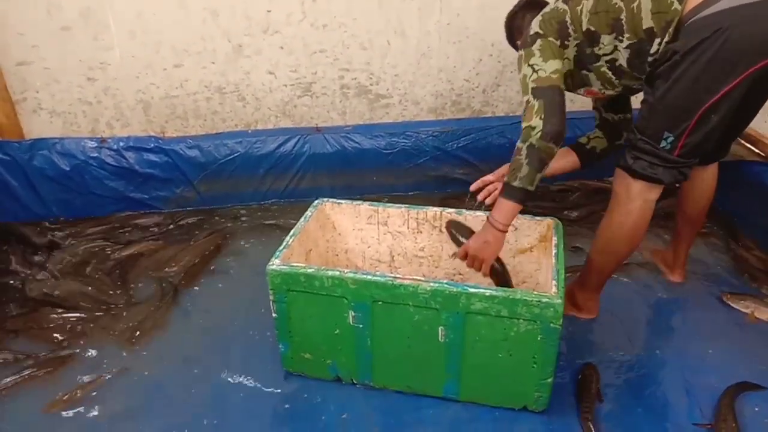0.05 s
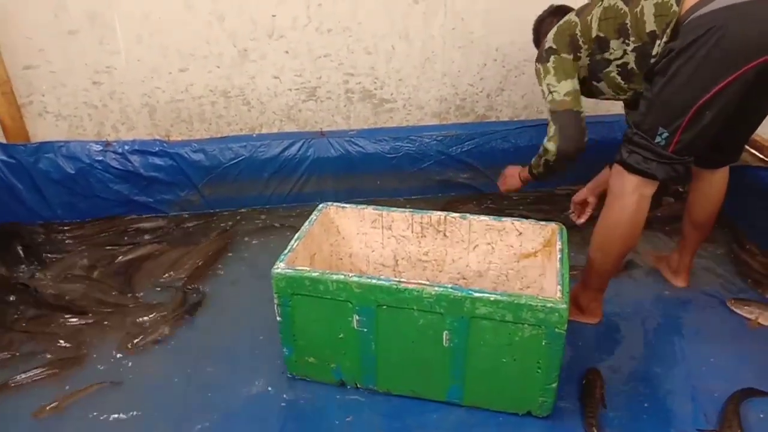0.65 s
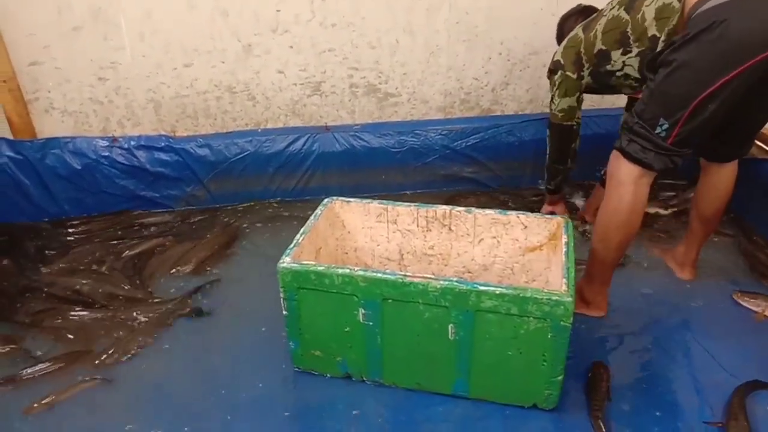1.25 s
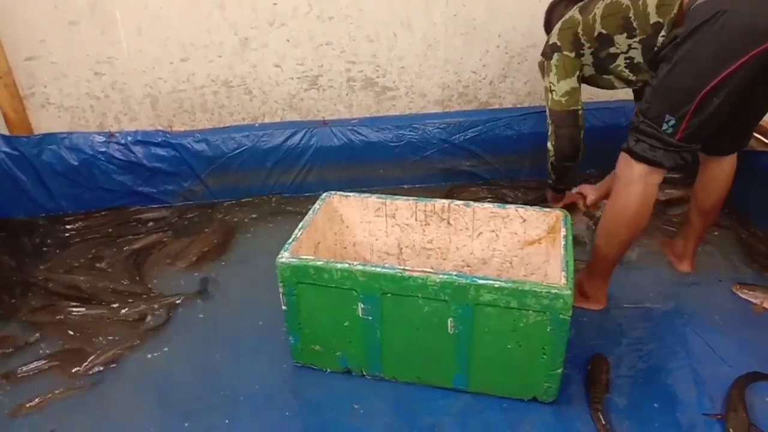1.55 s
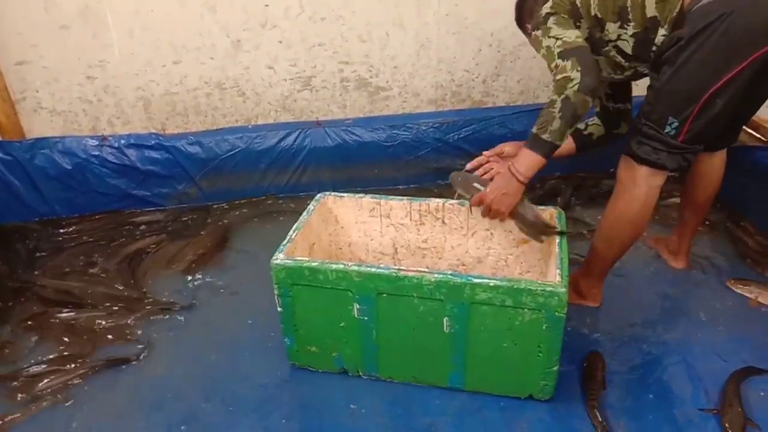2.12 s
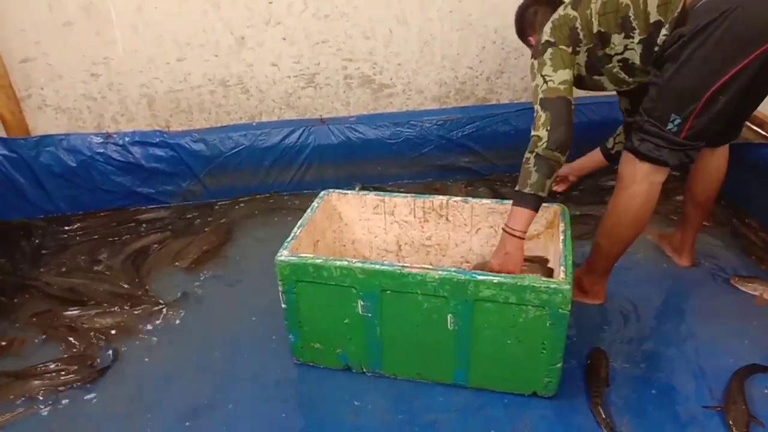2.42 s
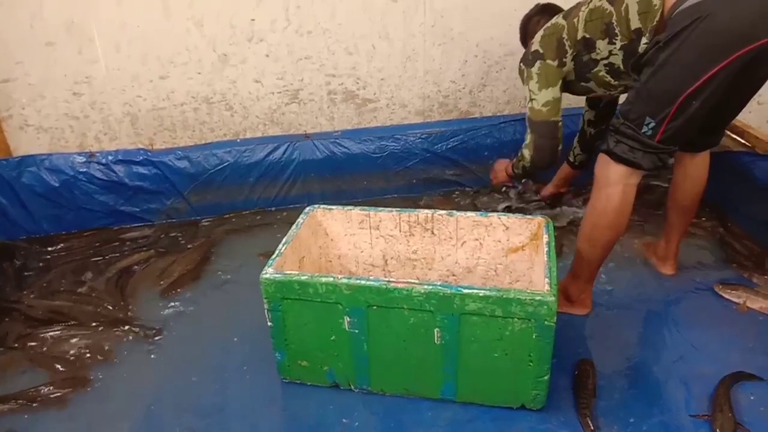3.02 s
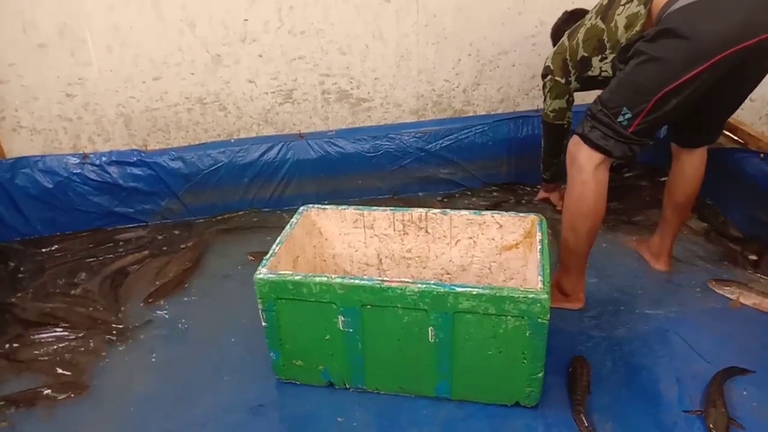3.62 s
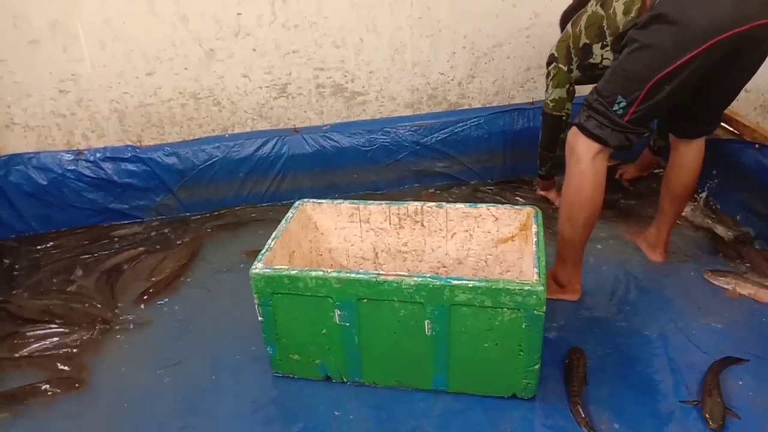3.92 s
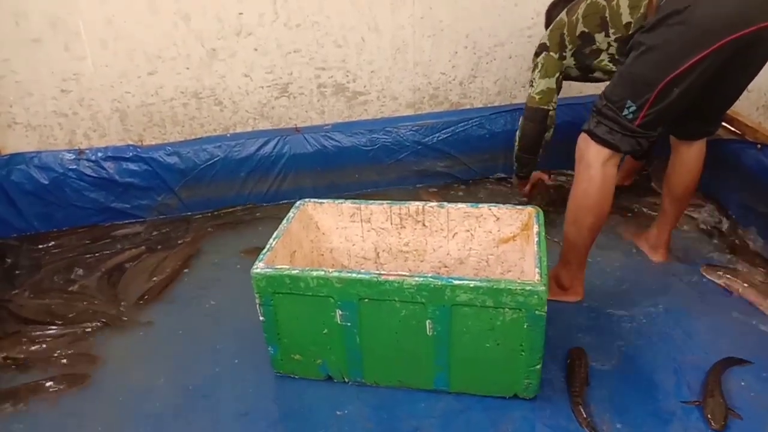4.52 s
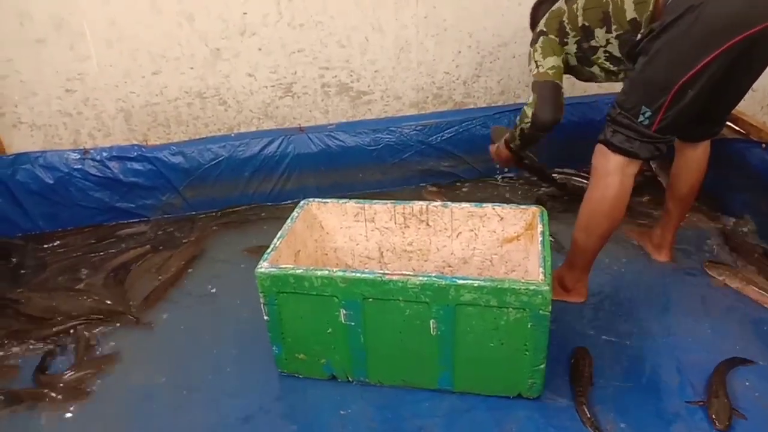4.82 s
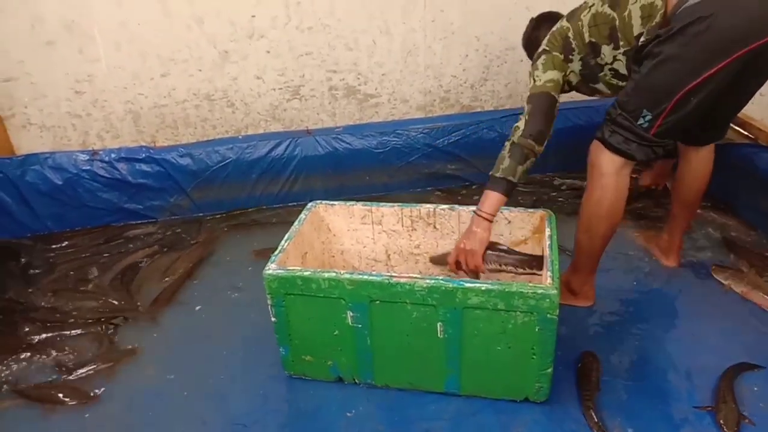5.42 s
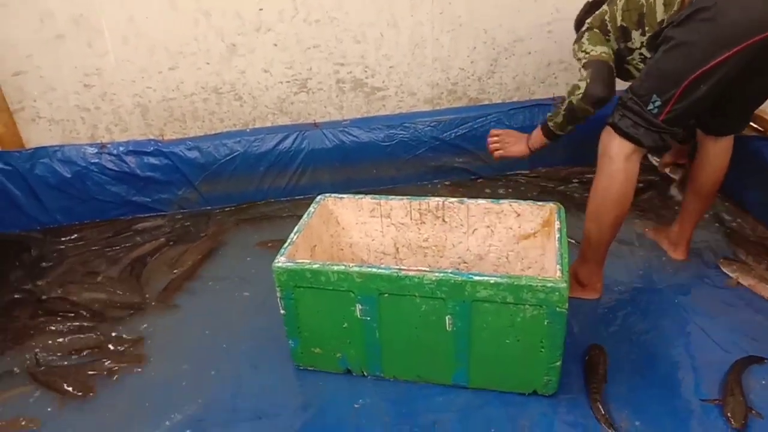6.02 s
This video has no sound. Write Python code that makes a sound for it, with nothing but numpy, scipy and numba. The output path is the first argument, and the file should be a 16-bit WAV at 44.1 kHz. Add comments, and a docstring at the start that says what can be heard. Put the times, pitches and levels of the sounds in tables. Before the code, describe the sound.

Fish thrash in a shallow tank as hands chase them, making repeated short splashes, wet slaps, gurgles and plops. A fish drops into an empty cool box with a hollow thud near the start, and softer knocks follow later. Near the end another lands and flops in a quick run of thumps before a last splash. One small microphone stands close by in a yard, with a short echo off a wall.

```python
"""A yard, beside a shallow tarp-lined tank, on one small microphone with a wall nearby.
Hands chase thrashing fish through the water and drop them into an empty cool box.
Churned water is a cloud of gulps, bubbles and spray; tails and hands slap the surface, bubbles plop,
spray spurts and drips. The wet fish smack and thud against the hollow box, which booms and rattles.
The wall adds a short echo, a faint steady wash lies behind, and the microphone colours it all."""
import sys
import numpy as np
from scipy import signal
from scipy.fft import rfft, irfft
from scipy.io import wavfile
from scipy.ndimage import uniform_filter1d
from numba import njit

SR = 44100
rng = np.random.default_rng(int(sys.argv[2]) if len(sys.argv) > 2 else 0)


def inscribe(sig):
    """Save sig as 16-bit PCM at rate SR to the path in sys.argv[1].

    A 1-D sig is mono; a 2-D sig holds one channel per row.
    Samples are clipped to [-1, 1] before scaling.
    """
    pcm = np.round(np.clip(np.atleast_2d(sig).T, -1, 1) * 32767)
    wavfile.write(sys.argv[1], SR, pcm.astype(np.int16))


N = 276066
TIME = np.arange(N) / SR

# bouts of thrashing: start_s, length_s, level_db, tiring_db_per_s, gulp_relative_db, spray_relative_db
THRASH_BOUTS = [(-.02, 0.038, -35, 36.5, -14.5, -18.5), (0.09, 0.1, -40.5, 6, -11.5, -18.5),
                (0.271, 0.53, -44, 5.5, -7, -24), (0.653, 0.13, -41.5, 5, -10.5, -30),
                (0.889, 0.22, -29, 6.5, -11.5, -27.5), (1.107, 0.22, -27.5, 1.5, -11.5, -23),
                (1.373, 0.36, -31.5, -3, -15, -24), (2.368, 0.24, -54.5, 18, 1.5, -18),
                (2.671, 0.032, -29.5, -17, -9, -24), (2.788, 0.094, -24, -0.5, -4.5, -28),
                (2.914, 0.27, -28.5, -1, -11, -24), (3.214, 0.12, -34.5, -4, -4, -28),
                (3.33, .18, -29.5, 22.5, -3.5, -24.5), (3.635, 0.061, -55.5, 5, 0.5, -32.5),
                (3.842, 0.052, -43, 6.5, 2, -10), (3.998, 0.098, -36.5, -1, -12.5, -21),
                (4.159, 0.22, -27, 23, -13, -18), (4.362, 0.12, -32.5, 21, -4, -17.5),
                (4.51, 0.18, -35.5, 26, -34, -24.5), (4.866, 0.075, -45.5, -3, -22, -30),
                (5.028, .08, -46.5, 1, -7.5, -25), (5.378, 0.28, -53, -7, -6.5, -27.5),
                (5.735, .15, -30.5, -2, -12.5, -26), (6.158, 0.063, -23, 16, -6.5, -13)]
# wet slaps and swishes, from tails and hands on the water and wet fish smacking the box:
# start_s, level_db, body_relative_db, mist_relative_db, rise_s, t60_s
WET_SLAPS = [(.104, -23, -7, -15, .0004, 0.1), (0.386, -29, -38.5, -20, 0.00031, 0.069),
             (.654, -29.5, -32, -11.5, 0.00033, 0.23), (.788, -27.5, -5.5, -38, 0.00067, 0.26),
             (.912, -20, -3, -20, .003, 0.45), (.96, -16.5, -12, -31, 0.0026, 0.27),
             (1.268, -7.5, -14, -18, 0.0032, 0.085), (1.413, -15.5, -18.5, -23.5, 0.0038, 0.22),
             (1.67, -29.5, 10.5, -30, 0.013, 0.23), (1.839, -23, -17.5, -16, 0.00036, 0.12),
             (2.398, -28.5, 7, -33, 0.0064, 0.057), (2.68, -23, 8.5, -13, 0.019, 0.25),
             (2.837, -23, -9, -7, 0.00069, .13), (3.095, -16, -7.5, -17, 0.0095, 0.33),
             (3.134, -11.5, -5.5, -14.5, 0.0035, 0.17), (3.362, -21, 5, -12, 0.0015, 0.34),
             (3.837, -26.5, -16, -28, 0.0083, 0.83), (4.112, -13, -2, -14, .0004, 0.24),
             (4.174, -6.5, -12, -21, 0.00032, 0.25), (4.365, -21, 5.5, -9.5, 0.0026, 0.25),
             (4.626, -27, -14, -30, 0.00055, 0.079), (5.129, -18, 7.5, -20, .003, .12),
             (5.405, -29, -14, -17, 0.00049, 0.11), (5.743, -3.5, -4, -26, 0.0052, 0.047),
             (5.776, -22.5, 24, -39, .0007, 0.05), (5.985, -23, -26, -21, 0.0017, 0.3),
             (6.146, -19, -10, -13, 0.0031, 0.54), (6.184, -12, -6, -12.5, .001, 0.31)]
# single bubbles and wet smacks: start_s, level_db, pitch_hz, t60_s
BUBBLE_PLOPS = [(0.038, -27, 1540, 0.018), (.062, -35, 1260, 0.037), (0.3843, -10, 1905, .012),
                (0.53, -36, 3460, 0.029), (.656, -36, 1213, 0.082), (0.688, -35, 3240, 0.048),
                (.789, -26, 918, .07), (.809, -37, 3510, 0.083), (0.825, -24.5, 2194, 0.038),
                (1.27, -16.5, 1390, 0.045), (1.89, -27.5, 1364, 0.064), (1.99, -40, 566, 0.076),
                (2.084, -33.5, 2040, 0.033), (2.407, -27, 1274, 0.055), (2.589, -39, 1975, 0.051),
                (2.781, -7, 1540, .007), (2.846, -16.5, 1272, 0.044), (4.067, -30, 1176, 0.067),
                (4.286, -19, 1490, .019), (4.454, -26.5, 1617, 0.13), (4.656, -29.5, 1463, 0.056),
                (4.826, -40, 3050, 0.064), (4.862, -38.5, 1960, 0.056), (4.89, -41, 960, 0.12),
                (4.922, -34.5, 1140, 0.034), (4.994, -37.5, 1673, 0.021), (5.052, -38.5, 3080, .044),
                (5.363, -42, 1273, 0.088), (5.542, -33, 1720, 0.054), (5.877, -4.5, 1770, 0.0064),
                (5.987, -10.5, 1420, 0.0173)]
# fish hitting the box: start_s, level_db, contact_s, rattle_relative_db,
# ring_share (the part of the ring time that the fish's weight leaves)
FISH_THUDS = [(.407, -19.5, 0.0007, -3.5, 0.16), (0.411, -4, 0.0035, -19, 0.89),
              (2.132, -33, 0.0034, 5, 0.58), (2.524, -29.5, 0.0041, 1, 0.46),
              (2.585, -30, 0.0049, -19, 0.31), (5.121, -32, 0.0019, 11, 0.61),
              (5.13, -15, 0.0019, 1.5, 0.28), (5.624, -8.5, 0.0051, 3.5, 0.24),
              (5.651, -12.5, 0.0023, -10, 0.65), (5.681, -12, 0.0024, -11, 0.15), (5.746, -19, .0022, 8, 1),
              (5.779, -10, 0.0019, 1, 0.61), (5.811, -10, 0.0024, -23, 0.3),
              (5.883, -13.5, 0.0021, -3, 0.41), (5.988, -19, 0.0012, -2.5, 0.45),
              (6.017, -20.5, 0.0072, 8, 0.38)]
# modes of the hollow box, undamped by fish: pitch_hz, level_db, t60_s
BOX_MODES = [(126.6, -9.5, 0.61), (160.3, -3.5, 0.76), (206.3, -2, 0.49), (223, -1.5, 0.11),
             (262, -12, 0.69), (289, -21, 0.96), (341.2, -10.5, 0.54), (460, -13, 0.11), (570, 0.5, 0.15),
             (653, -9.5, 0.46), (677, -9, 0.18), (770, -16, 0.27), (843, -11, 0.26)]
# brief thin spurts of spray and small drips: start_s, level_db
SPRAY_SPURTS = [(.003, -27.5), (0.153, -31.5), (.542, -45), (1.107, -21), (1.736, -27.5), (1.916, -28.5),
                (2.309, -57), (3.511, -32.5), (4.722, -42.5), (5.497, -41)]
# spectrum of splashing water: frequency_hz, gain_db
SPLASH_SPECTRUM = [(100, 2.5), (200, -9.5), (350, -6), (500, -4), (720, -2.5), (870, 1.5), (1050, -3),
                   (1500, -0.5), (2100, -1.5), (2800, -9), (3600, -14), (4500, -29), (6000, -28.5),
                   (10000, -41.5), (16000, -44)]
# spectrum of the background wash: frequency_hz, gain_db
WASH_SPECTRUM = [(25, -14), (50, -2.5), (80, 6), (200, 8), (500, -18.5), (900, -18), (1400, 3),
                 (2000, -5.5), (3000, -37), (5000, -21.5), (10000, -33), (16000, -32)]
# response of the small microphone: frequency_hz, gain_db
MIC_RESPONSE = [(1050, -0.5), (1195, 5), (1265, 12), (1340, 2.5), (5300, -2.5), (6300, -6), (7000, -1),
                (8100, -13), (9200, 4), (10500, 12.5), (12300, -1), (13900, -2.5), (15000, 8)]

TOP_HZ = 15750  # upper edge of the sound


def churn(lively_db=-42):
    """Thrashing fish beat air into the water: deep gulps, ringing bubbles and crackling fine spray."""
    level_db, gulp_db, spray_db = agitation()
    gulps = bubble_cloud(gulp_db + tail_beats(0.5) - 0.6, per_s=500, lo_hz=138, hi_hz=757,
                         cycles=16, spread_db=0.5, glide=0.16, wet_db=-6)
    bubbles = bubble_cloud(level_db + tail_beats(0.78) - 3.5, per_s=1400, lo_hz=755.5, hi_hz=5390,
                           cycles=31.3, spread_db=4.5, glide=0.11, wet_db=-0.5)
    spray = bubble_cloud(spray_db + tail_beats(5.8) + 1, per_s=1300, lo_hz=4570, hi_hz=15100,
                         cycles=8.3, spread_db=5, glide=0.03, wet_db=8.5)
    large = signal.sosfiltfilt(signal.butter(6, 1080, "low", fs=SR, output="sos"), bubbles)
    small = signal.sosfiltfilt(signal.butter(4, 2380, "high", fs=SR, output="sos"), bubbles)
    medium = bubbles - large - small
    calm_db = np.minimum(level_db - lively_db, 0)  # calm water loses its large and small bubbles
    return gulps + large * undb(0.76 * calm_db) + medium + small * undb(0.5 * calm_db) + spray


def agitation(build_s=0.03, calm_db_per_s=119.5, slosh_db=-16, slosh_db_per_s=15.5):
    """Levels in dB of bubbles, gulps and spray: each bout builds fast, stops and leaves a slow slosh."""
    power = np.zeros((3, N)) + undb(-100) ** 2
    for start_s, length_s, level_db, tiring_db_per_s, gulp_db, spray_db in THRASH_BOUTS:
        age = TIME - start_s
        rest = np.maximum(age - length_s, 0)
        effort = np.clip(age / build_s, 0, 1) * undb(level_db - tiring_db_per_s * age.clip(0, length_s))
        thrash = effort * undb(-calm_db_per_s * rest)
        slosh = effort * undb(slosh_db - slosh_db_per_s * rest)
        power += np.outer(undb([0, gulp_db, spray_db]), thrash) ** 2
        power += np.outer(undb([0, -19, -28.5]), slosh) ** 2  # sloshing has few gulps and little spray
    return 10 * np.log10(power)


def tail_beats(spread_db, per_s=22):
    """Uneven tail beats swell and dip the level at random, in dB."""
    beats = rng.standard_normal(400)
    return spread_db * np.interp(TIME * per_s, np.arange(len(beats)), beats)


def bubble_cloud(level_db, per_s, lo_hz, hi_hz, cycles, spread_db, glide, wet_db, count=24000):
    """Random bubbles from three spots follow level_db; per_s is their rate in the wildest water."""
    when, chance, pitch, life, bigness, spot = rng.random((count, 6)).T
    start = (when * N).astype(np.int64)
    activity = undb(0.6 * (level_db[start] - level_db.max()))
    sounding = chance < activity * per_s * N / SR / count
    hz = lo_hz * (hi_hz / lo_hz) ** pitch
    turns = cycles * 2 ** (3 * life - 2)
    strength = undb(-spread_db * np.log(1 - 0.97 * bigness))
    # a small bubble is brief, so it needs a higher peak to carry the same power per Hz
    peak = strength * hz / np.sqrt(turns) * rng.choice([-1, 1], count)
    groups = [sounding & (np.floor(3 * spot) == k) for k in range(3)]
    cloud = sum(echo(ring_bubbles(N, start[g], hz[g], turns[g], peak[g], glide), wet_db) for g in groups)
    cloud = unit(band(colour(cloud, SPLASH_SPECTRUM), 0.73 * lo_hz, 1.92 * hi_hz))
    power = uniform_filter1d(uniform_filter1d(cloud ** 2, size=1800), size=1800)
    return cloud / np.sqrt(np.abs(power) + 1e-4) * undb(level_db)


@njit
def ring_bubbles(n, start, hz, cycles, peak, glide):
    """Each bubble is a damped sine that swells in a cycle or two and rises as it nears the surface."""
    out = np.zeros(n)
    for k in range(len(start)):
        length, phase = int(cycles[k] * SR / hz[k]) + 2, 0.
        for i in range(min(length, n - start[k])):
            phase += 2 * np.pi * hz[k] * (1 + glide * i / length) / SR
            swell = 1 - np.exp(-(phase / 6) ** 2)
            out[start[k] + i] += peak[k] * swell * np.exp(-6 * i / length) * np.sin(phase)
    return out


def slaps(grain_db=5.5, smack_t60_s=0.025, mist_rise_s=0.001):
    """A wet blow on water or box smacks and bursts into drops: a bright crack, a low body, a mist."""
    out, t = np.zeros(N), TIME[:SR // 2]
    for start_s, level_db, body_db, mist_db, rise_s, t60_s in WET_SLAPS:
        burst = colour(grainy_noise(len(t), grain_db), SPLASH_SPECTRUM)
        crack = unit(band(burst, 586, 5700))
        body = undb(body_db - 3) * unit(band(burst, 180, 384))
        mist = undb(mist_db - 5) * unit(band(burst, 10000, 16400)) * rise(t, mist_rise_s)
        envelope = (fade(t, t60_s) + 0.23 * fade(t, smack_t60_s)) * rise(t, rise_s)
        slap = undb(level_db - 6) / 2 * (crack + body + mist) * envelope
        add(out, start_s, echo(slap, wet_db=-8))
    return out


def plops(glide=0.11, followers=4, follower_db=-11, detune_octaves=0.128, spatter_db=-8):
    """One large bubble rings and rises in pitch; smaller ones break off after it in a wet spatter."""
    out, t = np.zeros(N), TIME[:SR // 3]
    for start_s, level_db, hz, t60_s in BUBBLE_PLOPS:
        delays_s = rng.random(followers) * t60_s / 2
        ratios = 2 ** (detune_octaves * rng.standard_normal(followers))
        family = [(0, 1, 0), *zip(delays_s, ratios, np.full(followers, follower_db))]
        spatter = unit(band(rng.standard_normal(len(t)), 0.67 * hz, 1.25 * hz, order=3))
        gurgle = undb(spatter_db) * spatter * fade(t, 1.53 * t60_s)
        for delay_s, ratio, bubble_db in family:
            age = np.maximum(t - delay_s, 0)
            phase = 2 * np.pi * hz * ratio * age * (1 + glide / 2 * np.minimum(age / t60_s, 1))
            gurgle += undb(bubble_db) * np.sin(phase) * fade(age, t60_s) * rise(age, 1 / hz)
        gurgle *= rise(t, 0.021 * t60_s)  # a short smack starts at once, a long gurgle swells
        add(out, start_s, echo(undb(level_db - 2) * gurgle, wet_db=-7))
    return out


def box_thuds(rattle_t60_s=0.14, settle_s=0.3):
    """A soft fish hits the box: its modes boom and its walls rattle; a longer contact is duller."""
    out, t = np.zeros(N), TIME[:SR * 2 // 3]
    choke = np.exp(-(t / settle_s) ** 4)  # the fish sinks onto the bottom and stops the ring
    for start_s, level_db, contact_s, rattle_db, ring_share in FISH_THUDS:
        push = np.sin(np.pi * np.minimum(t[:SR // 100] / contact_s, 1)) ** 2
        boom = sum(undb(mode_db) * np.cos(2 * np.pi * hz * t) * fade(t, ring_share * t60_s)
                   for hz, mode_db, t60_s in BOX_MODES)
        rattle = unit(band(rng.standard_normal(len(t)), 120, 950, order=4)) * fade(t, rattle_t60_s)
        response = undb(-5) * boom * choke + undb(rattle_db - 8) * echo(rattle, wet_db=1)
        add(out, start_s, undb(level_db) * signal.fftconvolve(response, push / push.sum()))
    return band(out, 116, 1700, order=6)  # the thuds carry hardly any deep bass


def spray_spurts(t60_s=0.039, rise_s=0.0014):
    """Spurts of spray and small drips, each a brief, thin burst of hiss."""
    out, t = np.zeros(N), TIME[:SR // 4]
    for start_s, level_db in SPRAY_SPURTS:
        spurt = unit(band(rng.standard_normal(len(t)), 3800, TOP_HZ)) * fade(t, t60_s) * rise(t, rise_s)
        add(out, start_s, echo(undb(level_db - 17) * spurt, wet_db=3))
    return out


def echo(x, wet_db, t60_s=0.3, treble_t60_s=0.27):
    """Reflections off the tank and nearby wall; each spot has its own pattern, and treble dies first."""
    t = TIME[:SR // 3]
    reflections = grainy_noise(len(t), grain_db=3)
    lows = band(reflections, 90, 7400) * fade(t, t60_s)
    treble = band(reflections, 6940, 14400) * fade(t, treble_t60_s)
    tail = (lows + treble) * rise(t, 0.00059)
    return x + undb(wet_db) * signal.oaconvolve(x, tail / np.sqrt(np.sum(tail ** 2)))[:len(x)]


def yard_wash(level_db=-58.5):
    """A faint steady wash of noise behind everything."""
    return undb(level_db) * unit(colour(rng.standard_normal(N), WASH_SPECTRUM))


def grainy_noise(n, grain_db):
    """Noise whose level jumps at random from sample to sample."""
    return rng.standard_normal(n) * undb(grain_db * rng.standard_normal(n))


def undb(db):
    """Decibels to gain."""
    return 10 ** (np.asarray(db) / 20)


def unit(x):
    """Scale to an rms of 1."""
    return x / np.sqrt(np.mean(x ** 2))


def rise(t, rise_s):
    """Onset from 0 to 1 with time constant rise_s."""
    return 1 - np.exp(-t / rise_s)


def fade(t, t60_s):
    """Exponential decay that loses 60 dB in t60_s."""
    return np.exp(-np.log(1000) * t / max(t60_s, 1e-3))


def add(out, start_s, x):
    """Mix x into out from start_s on."""
    i = max(int(start_s * SR), 0)
    out[i:i + len(x)] += x[:max(N - i, 0)]


def band(x, lo_hz, hi_hz, order=2):
    """Band-pass filter."""
    edges_hz = [lo_hz, min(hi_hz, SR / 2 - 1)]
    return signal.sosfilt(signal.butter(order, edges_hz, "band", fs=SR, output="sos"), x)


def colour(x, spectrum, size=2048):
    """Minimum-phase filter through the points (frequency_hz, gain_db)."""
    hz, db = np.transpose(spectrum)
    bin_hz = np.arange(size // 2 + 1) * SR / size
    gain = undb(np.interp(np.log(bin_hz + 1), np.log(hz), db))
    cepstrum = irfft(np.log(gain))
    cepstrum[1:size // 2] *= 2
    cepstrum[size // 2 + 1:] = 0
    return signal.fftconvolve(x, irfft(np.exp(rfft(cepstrum))))[:len(x)]


def scene():
    """Water and box heard from beside the tank, in mono, over the wash of the yard."""
    return (churn() + slaps() + plops() + spray_spurts() + box_thuds() + yard_wash())[None]


def record(dry):
    """The small microphone's port rings and notches the treble; the top is cut."""
    sound = colour(dry[0], MIC_RESPONSE)
    top_cut = signal.ellip(12, 0.2, 100, TOP_HZ, fs=SR, output="sos")
    return signal.sosfilt(top_cut, sound)[None]


dry = scene()
out = record(dry)
inscribe(out)
```